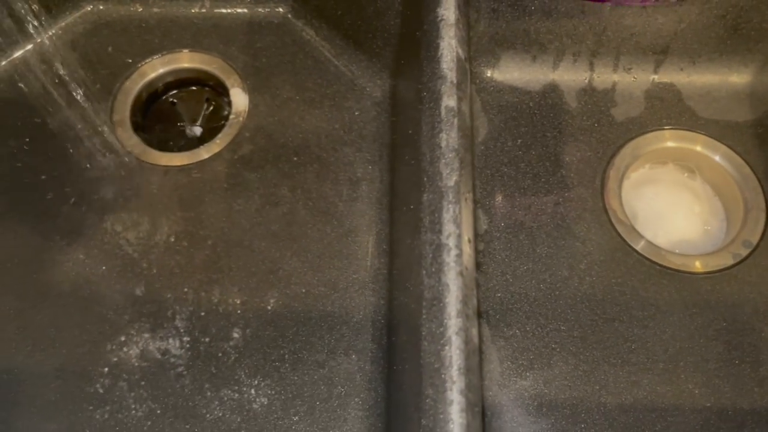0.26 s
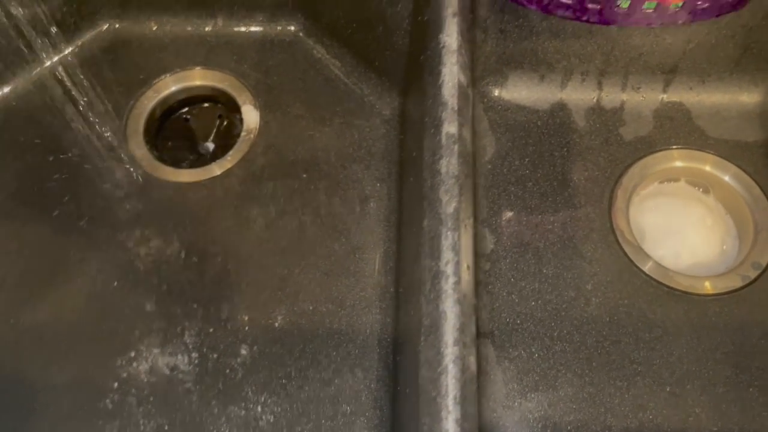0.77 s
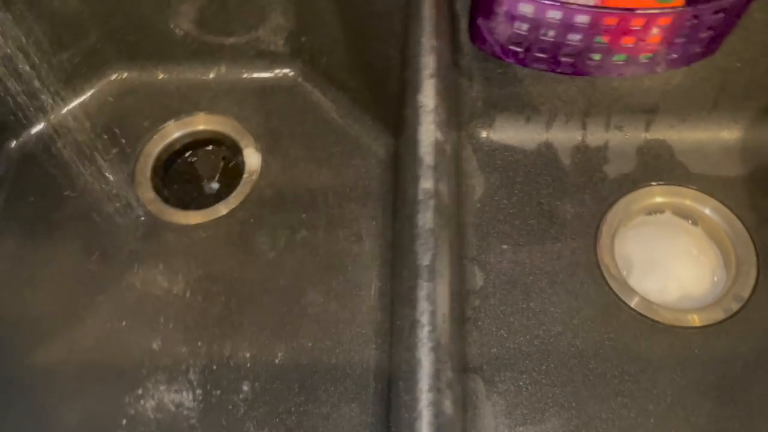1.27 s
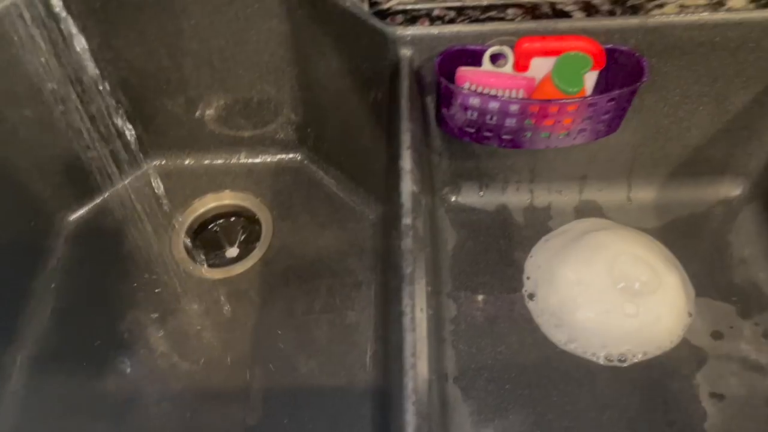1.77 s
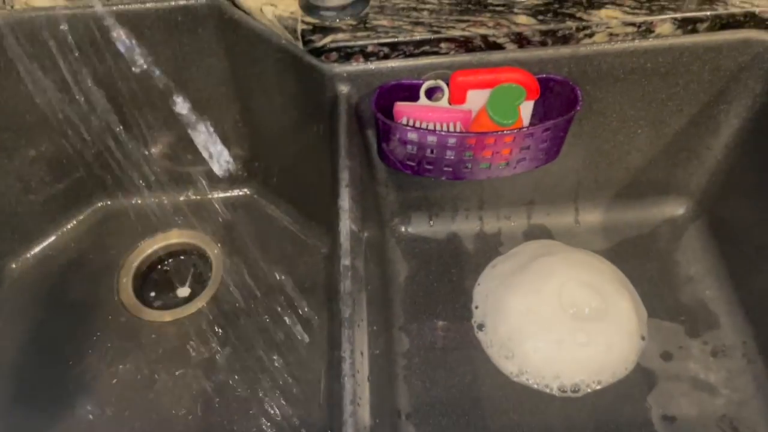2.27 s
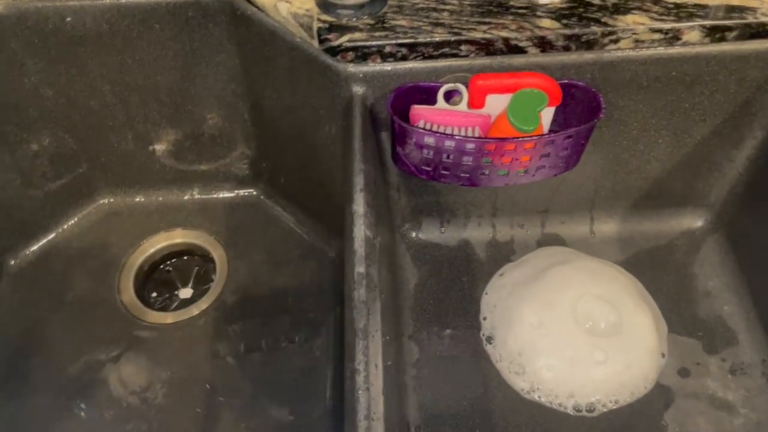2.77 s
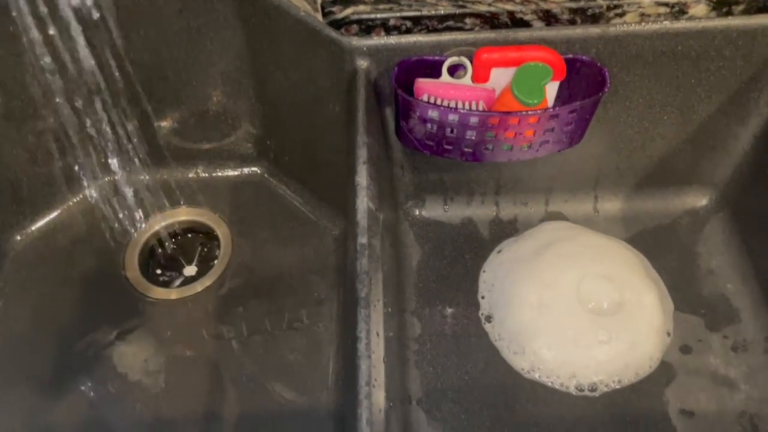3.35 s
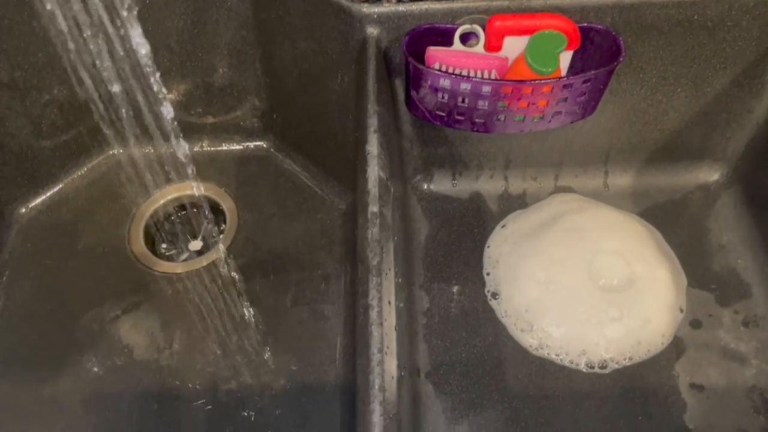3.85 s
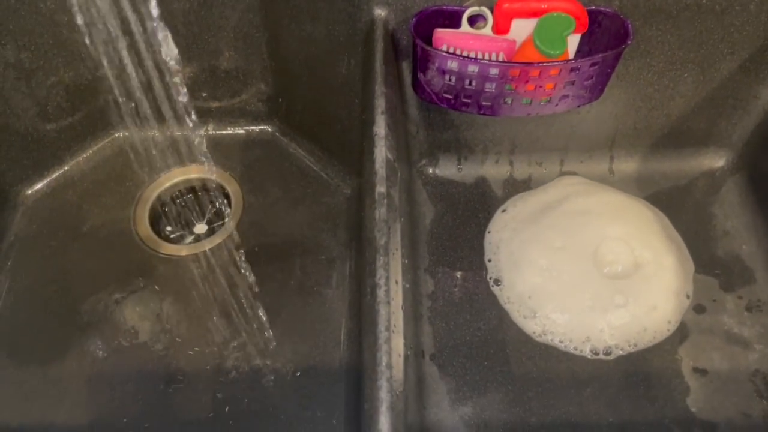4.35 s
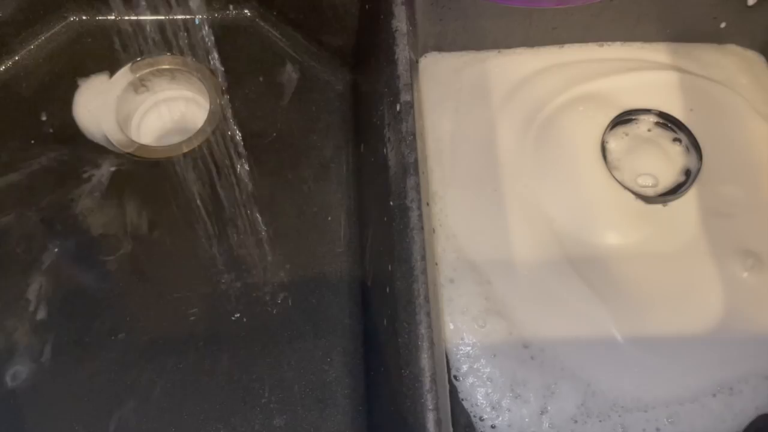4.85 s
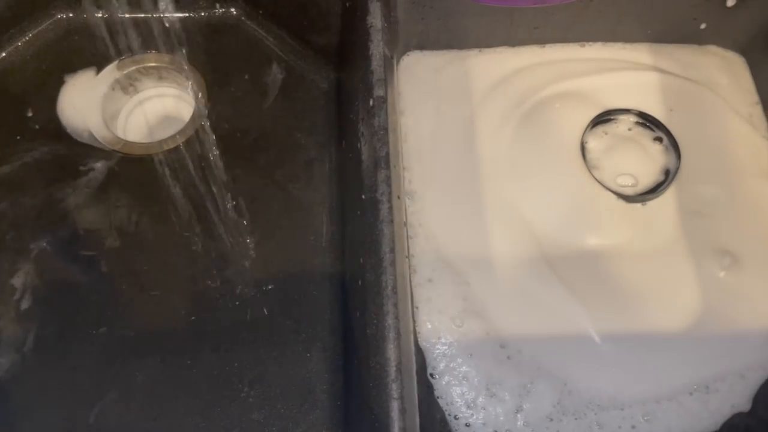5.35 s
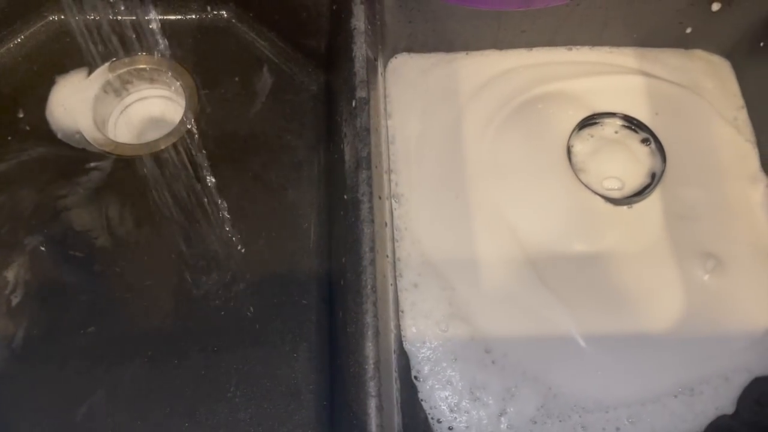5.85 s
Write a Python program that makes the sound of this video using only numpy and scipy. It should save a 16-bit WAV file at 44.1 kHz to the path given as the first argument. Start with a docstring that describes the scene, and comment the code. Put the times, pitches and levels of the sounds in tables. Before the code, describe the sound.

A kitchen garbage disposal hums freely, then turns muffled, surging and gurgling under running water, then cuts to a loud, thumping watery churn.

```python
"""A garbage disposal runs under a kitchen sink, heard in stereo from above the sink.
Three stretches are joined by hard cuts: it spins freely and hums; it is flooded, muffled and surging, with
tap hiss, gurgles and drops ticking on the basin; it churns open and loud. Slugs of water thump in the last two.
Hum is a sum of shaft orders; water is noise and small impacts coloured by chamber, drain throat and basin;
thumps (one of them the second cut itself), bubbles and drops are short rings placed by tables."""
import sys
import numpy as np
from scipy import signal
from scipy.fft import rfft, irfft, next_fast_len
from scipy.io import wavfile
from scipy.ndimage import uniform_filter1d, map_coordinates

SR = 44100
rng = np.random.default_rng(int(sys.argv[2]) if len(sys.argv) > 2 else 0)


def bounce(signal):
    """Save signal as a 16-bit WAV file at the path given by the first command-line argument."""
    frames = np.transpose(np.atleast_2d(signal))
    limited = np.clip(frames, -1, 1)
    pcm = np.round(limited * 32767).astype(np.int16)
    wavfile.write(sys.argv[1], SR, pcm)


N = 269010
TIME = np.arange(N) / SR
SIZE = next_fast_len(N + 8192, True)  # padded, so filters do not wrap around
FREQS = np.fft.rfftfreq(SIZE, 1 / SR)

# The two cuts between the stretches, each in seconds.
CUTS_S = [1.720, 4.8885]


def amp(db):
    """Decibels to gain."""
    return 10 ** (np.asarray(db) / 20)


def evened(x):
    """Scales to rms 1."""
    return x / np.sqrt(np.mean(x ** 2) + 1e-20)


def read(points):
    """Reads a table of (Hz, value) on every frequency bin, along a logarithmic frequency axis."""
    hz, value = np.transpose(points)
    return np.interp(np.log(FREQS + 1), np.log(hz + 1), value)


def shaped(x, gain):
    """Filters by a gain on every frequency bin."""
    return irfft(rfft(x, SIZE) * gain, SIZE)[..., :N]


def below(edge_hz):
    """Gain of a smooth low-pass, one half at the edge."""
    return 1 / (1 + (FREQS / edge_hz) ** 6)


def bell(hz, width_hz):
    """A bell over frequency: 1 at its centre, one half at half the width to either side."""
    return 2 ** -((2 * (FREQS - hz) / width_hz) ** 2)


def drift(rate_hz):
    """Slow random wandering of rms 1."""
    return evened(shaped(rng.standard_normal(N), below(rate_hz)))


def stereo_image(direct, scattered):
    """Phase, level and likeness of left and right over frequency: opposed near 8-10 kHz, nearly alike at 13 kHz."""
    # Each row: frequency in Hz, phase in radians by which left leads.
    lead = [(130, 0.1), (400, 0.84), (800, 0.78), (1000, 3.8), (1400, 7.55), (2050, 10.98), (2450, 13.32),
            (2950, 13.6), (3700, 18.06), (4400, 18.47), (6900, 17.56), (8200, 15.4), (9700, 15.5),
            (11000, 12.8), (13000, 12.58)]
    # Each row: frequency in Hz, level of left over right in dB.
    balance = [(30, 2), (330, 1), (470, 6.5), (860, 8), (1080, 2), (1280, 11.5), (1500, -2.5), (1720, 13.5),
               (2150, -1.5), (2750, 4), (3300, 8), (4300, 2.4), (6000, 1.5), (9000, -0.1)]
    # Each row: frequency in Hz, likeness of left and right from 0 to 1.
    likeness = [(60, 0.94), (250, 0.97), (600, 1), (1000, 0.39), (1600, 0.46), (2400, 0.52), (3800, 0.65),
                (5000, 0.38), (6100, 0.45), (7000, 0.68), (8300, 1), (9300, 0.99), (11000, 0.25),
                (13000, 1)]
    like = np.clip(read(likeness), 0, 1)
    shared = shaped(direct, np.sqrt((1 + like) / 2))
    apart = shaped(scattered, np.sqrt((1 - like) / 2))
    lean = amp(read(balance))
    left_right = np.array([lean, np.exp(-1j * read(lead))])
    left_right = left_right * np.sqrt(2 / (1 + lean ** 2))  # keeps the power of the pair
    return shaped(np.array([shared + apart, shared - apart]), left_right)


def hum(turns, orders, load, waver, coupling):
    """The unbalanced rotor gives a steady fundamental; higher orders ride on the water that its lugs hit."""
    out = np.zeros(N)
    for order, db in orders:
        swell = 1
        if order > 1:
            swell = load ** coupling * (1 + waver * (drift(9) + 1j * drift(9)))  # wavers in level and phase
        turning = np.exp(2j * np.pi * (order * turns + rng.random()))
        out += np.sqrt(2) * amp(db) * np.real(swell * turning)
    return out


def thrash(turns, beat, flutter_db, grain_share, grains_per_s=1800, grain_spread_db=4.5):
    """Turbulence and small impacts, bunched as each of the two lugs sweeps by; a direct and a scattered part."""
    sweep = 1 + beat * (np.cos(2 * np.pi * turns) + np.cos(4 * np.pi * turns))
    sizes = amp(grain_spread_db * np.minimum(rng.exponential(1, (2, N)), 4))
    hits = rng.random((2, N)) < grains_per_s / SR
    grains = evened(sizes * rng.choice([-1, 1], (2, N)) * hits)
    turbulence = rng.standard_normal((2, N))
    water = np.sqrt(grain_share) * grains + np.sqrt(1 - grain_share) * turbulence
    return water * evened(sweep * amp(flutter_db * drift(34)))


def basin(x, ring_s=0.011, ring_db=-9, lowest_hz=650):
    """Dense reflections between the sink walls ripple the spectrum above the bass."""
    t = np.arange(SR // 10) / SR
    echoes = rng.standard_normal(len(t)) * np.exp(-t / ring_s) * (t > .002)
    ripple = amp(ring_db) * (1 - below(lowest_hz))
    reflected = ripple * rfft(echoes / np.linalg.norm(echoes), SIZE)
    return shaped(x, (1 + reflected) / np.sqrt(1 + ripple ** 2))


def bubbling(x, patch_db, patch_hz=520, patch_s=.07):
    """Pockets of air come and go, so the colour shifts in short patches of time and frequency."""
    spectrum = signal.stft(x, nperseg=512)[2]
    bins = round(patch_hz * 512 / SR)
    frames = round(patch_s * SR / 256)
    patches = rng.standard_normal(spectrum.shape[1:])
    patches = uniform_filter1d(uniform_filter1d(patches, bins, 0), frames, 1)
    return signal.istft(spectrum * evened(amp(patch_db * evened(patches))))[1][:, :N]


def swaying(x, depth, rate_hz=7):
    """The water level rocks, so the pitch of what rings in the chamber wanders by a small share (depth)."""
    heard_at = np.arange(N) + np.cumsum(depth * drift(rate_hz))
    return map_coordinates(x, [heard_at], order=1, mode="mirror")


def steady_load(rumble_db, splash_db, throb_hz, splash_hz):
    """The rumble throbs at random; slosh and spray waver together. Rows: rumble, slosh, spray in dB."""
    splash = splash_db * drift(splash_hz)
    return np.array([rumble_db * drift(throb_hz), splash, splash])


def disposal(shaft_hz, orders, wash, modes, load, heard, rumble_hz, spray_hz, body_follows, waver, coupling,
             beat, flutter_db, patch_db, grain_share, sway):
    """Rotor hum and thrashed water ring in the chamber; the load swells rumble, slosh and spray."""
    # each swell has rms 1 over the stretch where it is heard
    rumble, slosh, spray = (v / np.sqrt(np.mean(v[heard] ** 2)) for v in amp(load))
    # the housing's own resonances are always driven, and feel the surges only in part
    body = (rumble * slosh) ** body_follows
    # the changing drag makes the shaft speed wander slightly
    turns = np.cumsum(shaft_hz * (1 + 0.00286 * drift(6.46))) / SR
    lift_db = sum(db * bell(hz, width_hz) for hz, width_hz, db in modes)
    colour = amp(read(wash) + lift_db) * np.sqrt(SR / 2)
    water = basin(thrash(turns, beat, flutter_db, grain_share))
    froth = bubbling(water, patch_db)

    deep, low, middle = below(rumble_hz), below(693), below(spray_hz)
    out = rumble * np.array([swaying(part, sway) for part in shaped(water, colour * deep)])
    out += body * shaped(water, colour * (low - deep))
    out += slosh * shaped(froth, colour * (middle - low))
    out += spray * shaped(froth, colour * (1 - middle))
    direct, scattered = out
    return stereo_image(direct + hum(turns, orders, rumble, waver, coupling), scattered)


def surging_load(rise_s=0.029, fall_s=0.076):
    """Each gulp of water and air caught by the lugs lifts the load, then lets it fall back."""
    # The flooded chamber between surges, quieter on the whole as it fills; levels count relative to each other.
    # Each row: time in seconds, rumble in dB, slosh in dB, spray in dB.
    filling = [(1.72, -23.5, -36, -45.5), (2.349, -27.5, -47.5, -48.5), (2.58, -23, -43.5, -45),
               (2.8, -23.5, -48, -43.5), (3.3, -30, -52, -50.5), (4.1, -33.5, -54.5, -60.5),
               (4.32, -27.5, -56.5, -77), (4.88, -29, -56.5, -79)]
    # Gulps. Each row: start in seconds, time until the fall in seconds,
    # then the lift of rumble, slosh and spray in dB once the rise is complete.
    gulps = [(1.757, 0.058, 3, 0, 3.5), (1.812, 0.067, 3, 5, 5.5), (1.997, 0.1, 7.5, 6.5, 4),
             (2.158, 0.13, 10, 8, 7.5), (2.383, 0.069, 10, 10, 6.5), (2.626, 0.12, 0.5, 6, -1),
             (2.817, 0.11, 4.5, 6.5, 1.5), (2.94, 0.13, 5, 7.5, 4.5), (3.093, 0.082, 7, 11.5, 5),
             (3.263, 0.12, 8, 11.5, 10.5), (3.487, 0.084, 6.5, 8.5, 4), (3.627, 0.21, 4, 4.5, 7),
             (3.836, 0.09, 10, 12, 9.5), (4.026, 0.051, 9, 12.5, 13.5), (4.193, 0.036, 6, 6, 13),
             (4.442, 0.03, 5.5, 4.5, 11), (4.547, 0.029, 4, 5, 9), (4.62, 0.023, 4.5, 6, 26.5)]
    s, *levels = np.transpose(filling)
    load = np.array([np.interp(TIME, s, db) for db in levels])
    for start, length, *lifts_db in gulps:
        rise = np.clip((TIME - start) / rise_s, 0, 1)
        fall = np.clip(1 - (TIME - start - length) / fall_s, 0, 1)
        load += np.outer(lifts_db, rise * fall)
    return load + steady_load(rumble_db=0.5, splash_db=1.03, throb_hz=24, splash_hz=22)


def throat(slosh_db, level_db=-10, ring_hz=3300, width_hz=650, closing_db_per_s=7):
    """The drain throat rings with each gulp and fades steadily as the rising water closes it."""
    ring = evened(shaped(rng.standard_normal((2, N)), bell(ring_hz, width_hz)))
    closing_db = closing_db_per_s * np.maximum(TIME - CUTS_S[0], 0)
    return stereo_image(*(ring * amp(level_db + slosh_db - closing_db)))


def tap(level_db=-2.0, away_db=-12):
    """The stream sliding over the sink floor: a faint, even hiss that drops while the stream is taken away."""
    # The stream before the level setting. Each row: frequency in Hz, density in dB per Hz.
    stream = [(600, -118), (2500, -100), (4000, -104), (6000, -107), (9000, -106), (13000, -106.5),
              (16000, -113)]
    # The stream is away from the first to the second time, in seconds.
    away_s = (2.5, 3.45)
    hiss = shaped(rng.standard_normal((2, N)), amp(read(stream)) * np.sqrt(SR / 2))
    away = shaped(1. * ((TIME > away_s[0]) & (TIME < away_s[1])), below(8))
    return stereo_image(*(amp(level_db + away_db * away) * hiss))


def thumps(rise_per_s=0.78, knock_db=-18, knock_hz=520):
    """Each thump swells and dies in a few cycles, rising in pitch as a shrinking air pocket does, with a knock."""
    # Slugs of water in the chamber, and at 4.89 s the short low thump of the cut itself.
    # Each row: start in seconds, peak of the ring in dB ahead of the stereo image, ring in Hz, swell in seconds.
    bumps = [(1.774, -7.5, 219, 0.0058), (1.868, -18.5, 225, .014), (1.907, -18.5, 485, 0.014),
             (2.048, -17.5, 467, .01), (2.183, -12, 139, 0.015), (2.255, -13, 135, 0.01),
             (2.425, -14, 224, 0.012), (2.425, -10, 129.5, 0.016), (2.649, -17, 132, 0.015),
             (2.946, -16.5, 126, .014), (3.410, -16.5, 465, 0.009), (3.651, -12.5, 213, 0.0092),
             (3.860, -22, 453, .009), (3.869, -14.5, 122.5, .014), (4.334, -13.5, 234, 0.011),
             (4.826, -20, 413, 0.016), (4.89, -13.5, 161, 0.0055), (4.999, -8.5, 225, 0.011),
             (5.060, -11.5, 228.5, .015), (5.195, -15.5, 405, 0.0081), (5.210, -12, 225, 0.016),
             (5.296, -13, 471, 0.016), (5.351, -9.5, 466, .012), (5.363, -7, 220, 0.013),
             (5.427, -7, 221.5, 0.018), (5.482, -8.5, 216, 0.0097), (5.554, -8.5, 208, 0.015),
             (5.574, -18, 455, 0.0088), (5.717, -8.5, 233, 0.017), (5.808, -14.5, 222.6, 0.025),
             (5.871, -7.5, 228, 0.021), (6.025, -11, 232, .018)]
    t = np.arange(SR // 8) / SR
    dull = signal.butter(2, [200, knock_hz], "bandpass", fs=SR, output="sos")
    out = np.zeros(N + len(t))
    for s, db, ring_hz, swell_s in bumps:
        swell = (t / swell_s * np.exp(1 - t / swell_s)) ** 2
        pitch_hz = ring_hz * (1 + rise_per_s * (t - swell_s))
        ring = np.sin(2 * np.pi * np.cumsum(pitch_hz) / SR)
        knock = amp(knock_db) * evened(signal.sosfilt(dull, rng.standard_normal(len(t))))
        out[round(s * SR):][:len(t)] += amp(db) * swell * (ring + knock)
    return stereo_image(out[:N], np.zeros(N))


def gurgles(bubbles_per_s=190, spread_octaves=.13, ring_cycles=8, rise_per_s=4):
    """A swarm is many short rings of like pitch, each gliding up as its bubble nears the surface."""
    # Swarms of bubbles in the flooded drain. Each row: start in seconds, length in seconds,
    # rms level over that length in dB ahead of the stereo image, ring in Hz.
    swarms = [(1.86, 0.078, -32.5, 1147), (2.01, 0.088, -35, 1225), (2.172, 0.12, -33, 1170),
              (2.409, 0.073, -32, 1540), (2.649, 0.095, -36.5, 1384), (2.81, .23, -44.5, 2170),
              (3.094, .08, -45.5, 2200), (3.268, 0.084, -46, 2230), (3.87, 0.073, -37, 1215),
              (4.65, .015, -39, 1190)]
    t = np.arange(SR // 25) / SR
    out = np.zeros(N)
    for start, length, db, ring_hz in swarms:
        swarm = np.zeros(round(length * SR) + len(t))
        count = max(round(bubbles_per_s * length), 1)
        for early, late, pitch in rng.random((count, 3)):
            hz = ring_hz * 2 ** (spread_octaves * (4 * pitch - 2))
            bubble = np.sin(2 * np.pi * hz * t * (1 + rise_per_s * t / 2)) * np.exp(-t * hz / ring_cycles)
            # the mean of two draws gathers the bubbles toward the middle of the swarm
            swarm[round((early + late) / 2 * length * SR):][:len(t)] += bubble
        swarm *= np.sqrt(length * SR / np.sum(swarm ** 2))
        out[round(start * SR):][:len(swarm)] += amp(db) * swarm
    return stereo_image(out, np.zeros(N))


def drop(ring_hz, snap_s=0.0016, ring_s=0.0051, ring_db=-18, tail_s=.009, tail_db=-16):
    """A sharp slap, a tiny bubble that rings, and a short splatter; a lower ring brings a duller slap."""
    t = np.arange(SR // 20) / SR
    envelope = np.exp(-t / snap_s) + amp(tail_db) * np.exp(-t / tail_s)
    slap = rng.standard_normal(len(t)) * envelope
    bubble = amp(ring_db) * np.sin(2 * np.pi * ring_hz * t) * np.exp(-t / ring_s)
    low_hz = np.clip(0.67 * ring_hz, 5900, 9000)
    top_hz = np.clip(1.6 * ring_hz, 10000, 15000)
    band = signal.butter(3, [low_hz, top_hz], "bandpass", fs=SR, output="sos")
    sound = signal.sosfilt(band, slap + bubble)
    return sound / abs(sound).max()


def splashes(drops_db=2, patter_db=-53, patter_per_s=75, patter_from_s=2.6):
    """Single large drops, and a fine patter of small drops from patter_from_s onward."""
    # Drops on the basin. Each row: time in seconds, peak in dB before the common lift drops_db, ring in Hz.
    drops = [(2.164, -28, 13700), (2.3056, -31, 13000), (2.9013, -28.5, 6650), (3.3547, -27, 7200),
             (3.612, -22.5, 7540), (3.7204, -43, 12500), (3.7569, -39, 12000), (4.0103, -38, 12700),
             (4.119, -30, 11700), (4.148, -33, 11900), (4.2058, -39, 12000), (4.2587, -32, 10500),
             (4.7376, -39, 13200), (4.773, -30.5, 11000), (4.7864, -37, 10800), (4.939, -26, 13000)]
    out = np.zeros(N)
    for s, db, ring_hz in drops:
        sound = amp(db + drops_db) * drop(ring_hz)
        out[round(s * SR):][:len(sound)] += sound
    for ring_hz in np.geomspace(8500, 14000, num=6):  # the patter is shared among six pitches
        hits = (rng.random(N) < patter_per_s / 6 / SR) & (TIME > patter_from_s)
        sizes = amp(patter_db) * rng.uniform(.5, 2, N)
        out += signal.oaconvolve(hits * sizes, drop(ring_hz))[:N]
    return stereo_image(out, np.zeros(N))


def opening_load(slosh_db=-1.5, spray_db=-4.5, clear_s=5.13, build_s=0.1):
    """Slosh and spray stay dull until the drain throat clears, then the flow is even."""
    covered = np.clip((clear_s - TIME) / build_s, 0, 1)
    even = steady_load(rumble_db=0.5, splash_db=0.67, throb_hz=20.8, splash_hz=23)
    return even + np.outer([0, slosh_db, spray_db], covered)


def scene():
    """The three states of the machine, cut one after the other, with the thumps laid over them."""
    # Shaft speed in turns per second: spinning, flooded, churning.
    shaft_hz = [64.04, 63.95, 63.5]
    # Shaft orders of the hum. Each row: multiple of the shaft speed, rms level in dB before load and waver.
    spin_orders = [(1, -29.9), (2, -29.9), (3, -19.4), (4, -23.4), (5, -40.2), (6, -32.9), (10, -42.3),
                   (18, -37.6), (22, -44.4), (36, -45.4)]
    flood_orders = [(1, -30.5), (2, -25.2), (3, -42.9), (4, -40.7), (32, -59.5)]
    churn_orders = [(1, -36.4), (2, -28.1), (3, -32.3), (4, -30.5), (6, -32.6), (8, -30.0), (12, -40.2),
                    (16, -40.5), (18, -34.6), (22, -44.3), (26, -43.8), (28, -35.9)]
    # Water thrashed in the chamber, as it comes up the drain, before the resonances lift it.
    # Each row: frequency in Hz, density in dB per Hz.
    spin_wash = [(30, -74), (85, -69), (130, -52), (240, -37.5), (290, -54), (480, -54), (700, -67),
                 (1300, -74.5), (2200, -65.5), (2700, -87), (6000, -72), (9000, -79.5), (14000, -76.5),
                 (15600, -92)]
    flood_wash = [(30, -81), (85, -46.5), (130, -41.5), (240, -52.5), (290, -72), (480, -64.5), (700, -63),
                  (1300, -61.5), (2350, -75.5), (2750, -87), (6000, -89), (9000, -99), (14000, -95.5),
                  (15600, -105)]
    churn_wash = [(30, -83), (85, -66), (130, -47), (240, -46.5), (290, -49), (480, -52), (700, -52),
                  (870, -61), (1300, -65.5), (1480, -66), (2200, -63.5), (2900, -69.5), (6000, -73.5),
                  (9000, -75.5), (14000, -80.5), (15600, -89)]
    # Resonances of chamber, drain throat and basin. Each row: centre in Hz, width in Hz at half the lift, lift in dB.
    spin_modes = [(467, 64, 7), (630, 100, 4.5), (741, 110, 7.5), (963, 242, 16), (1160.5, 113, 19),
                  (1338, 135, 16.5), (1688, 600, 10.5), (3176, 1045, 20), (3800, 340, 5.5), (5750, 100, 7)]
    flood_modes = [(246, 92, 10.86), (350.5, 81, 12.6), (463, 117, 15.2), (653, 35, 7.1), (1150, 38, 6.7),
                   (2300, 350, 0.75), (5250, 630, 6.3), (5920, 360, 10.5), (7550, 1300, 7.1)]
    churn_modes = [(175, 14, 5.3), (225, 49, 14.7), (369, 95, 5.3), (467, 65, 12.2), (774, 69, 4.8),
                   (957, 60, 6.1), (1170, 273, 13.3), (1650, 150, 12.9), (1776, 65, 11.4), (1980, 300, 4.4),
                   (2190, 150, 5.4), (2690, 90, 5.9), (3190, 170, 7.6), (3520, 340, 8.5), (3820, 220, 6.2),
                   (6100, 200, 7.1)]

    state = np.searchsorted(CUTS_S, TIME)
    even_load = steady_load(rumble_db=-0.1, splash_db=0.36, throb_hz=5.4, splash_hz=35)
    spinning = disposal(
        shaft_hz[0], spin_orders, spin_wash, spin_modes, even_load, state == 0,
        rumble_hz=304, spray_hz=2700, body_follows=0.54, waver=.04, coupling=0.11,
        beat=0.061, flutter_db=0.2, patch_db=1.3, grain_share=0.36, sway=0.00354)
    surges = surging_load()
    flooded = disposal(
        shaft_hz[1], flood_orders, flood_wash, flood_modes, surges, state == 1,
        rumble_hz=168.0, spray_hz=4380, body_follows=0.025, waver=0.29, coupling=1.0,
        beat=0.11, flutter_db=1.0, patch_db=2.0, grain_share=0.21, sway=0.01825)
    flooded = flooded + throat(surges[1]) + tap() + gurgles() + splashes()
    churning = disposal(
        shaft_hz[2], churn_orders, churn_wash, churn_modes, opening_load(), state == 2,
        rumble_hz=316, spray_hz=2760, body_follows=0.13, waver=0.23, coupling=0.45,
        beat=0.039, flutter_db=0.15, patch_db=1.5, grain_share=0.38, sway=0.0508)

    out = thumps()
    for k, sound in enumerate([spinning, flooded, churning]):
        out += sound * uniform_filter1d(1. * (state == k), round(.002 * SR))  # 2 ms crossfade at each cut
    return out


def record(dry):
    """The recorder rounds off the highest peaks and limits the band."""
    rounded = dry / (1 + (dry / .94) ** 8) ** (1 / 8)
    lowpass = signal.firwin(511, 15750, window=("kaiser", 9), fs=SR)  # edge in Hz
    return signal.oaconvolve(rounded, lowpass[None], "same")


dry = scene()
out = record(dry)
bounce(out)
```